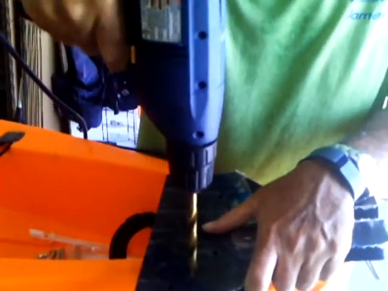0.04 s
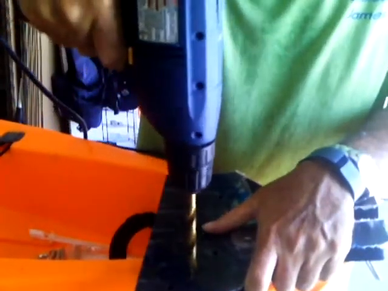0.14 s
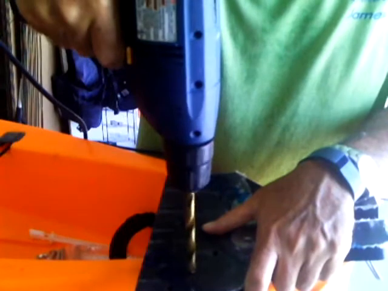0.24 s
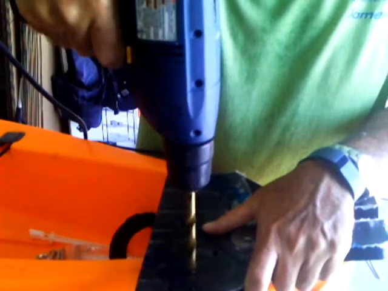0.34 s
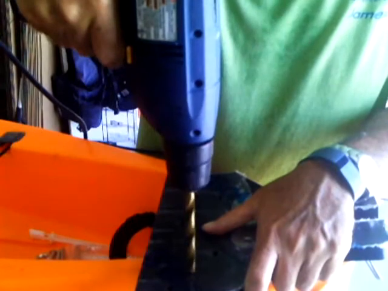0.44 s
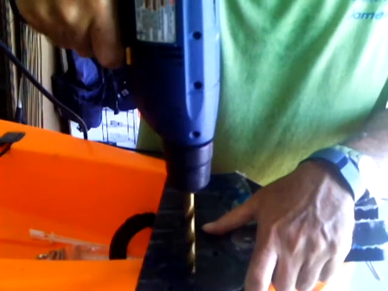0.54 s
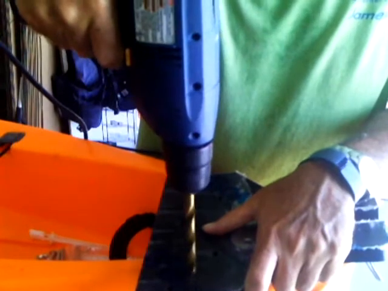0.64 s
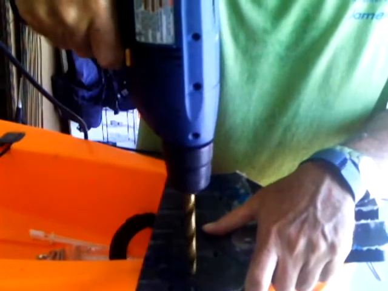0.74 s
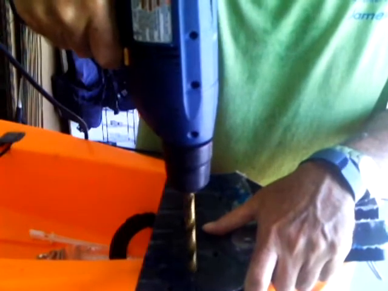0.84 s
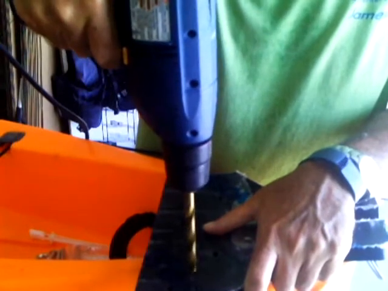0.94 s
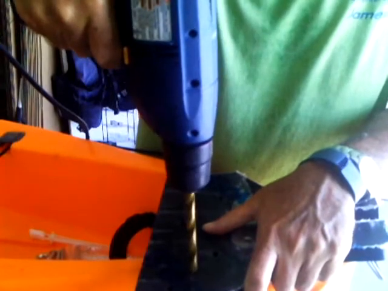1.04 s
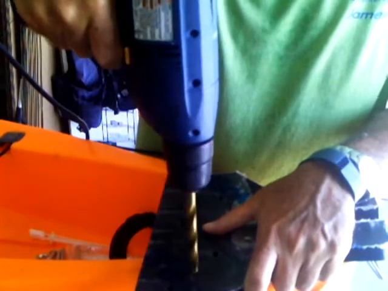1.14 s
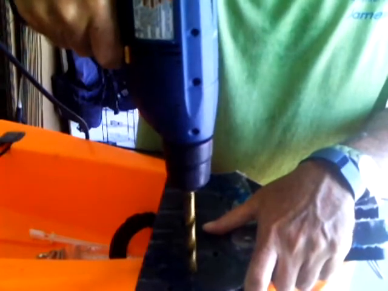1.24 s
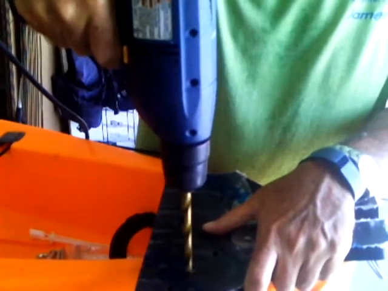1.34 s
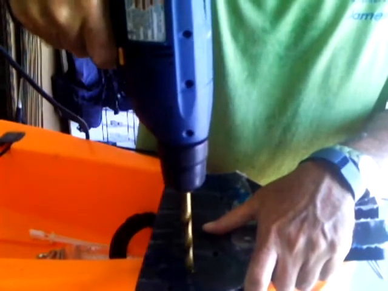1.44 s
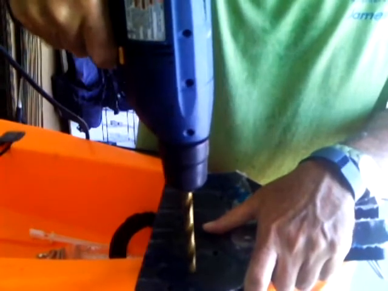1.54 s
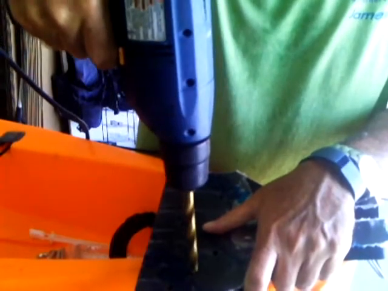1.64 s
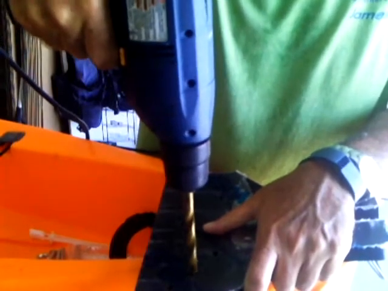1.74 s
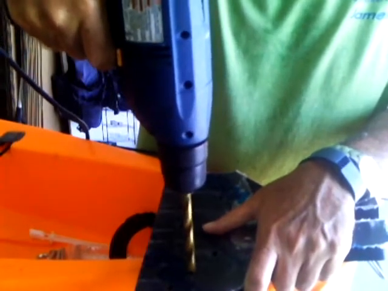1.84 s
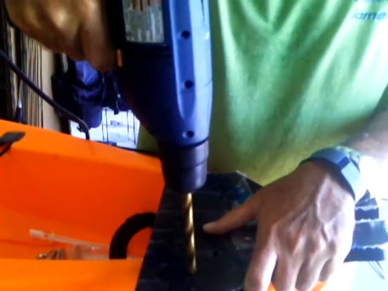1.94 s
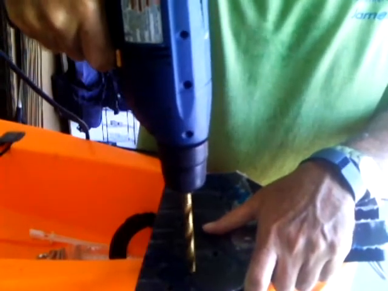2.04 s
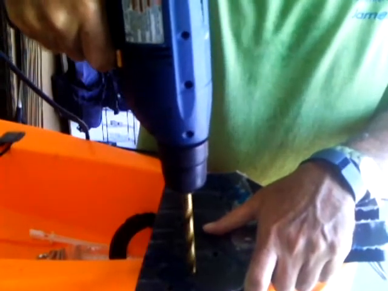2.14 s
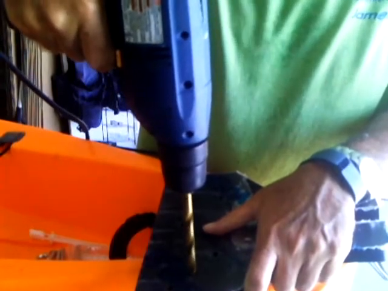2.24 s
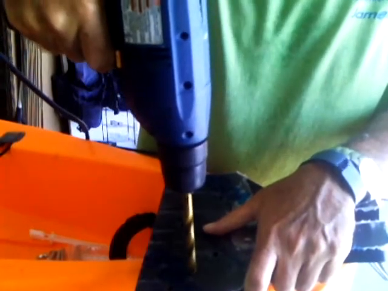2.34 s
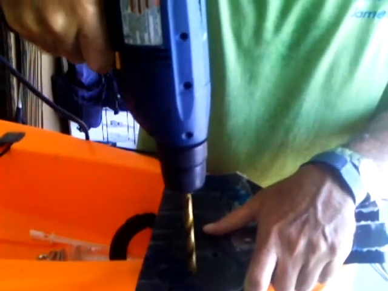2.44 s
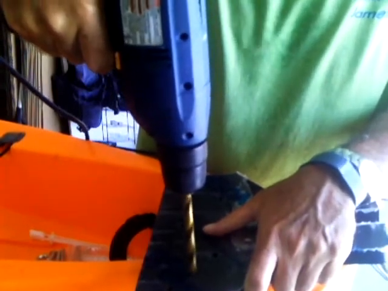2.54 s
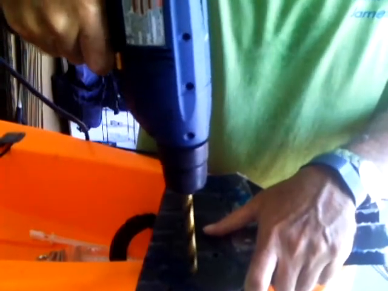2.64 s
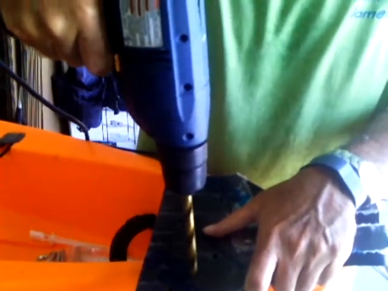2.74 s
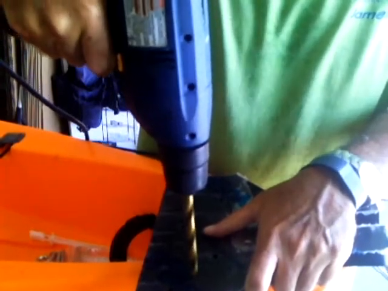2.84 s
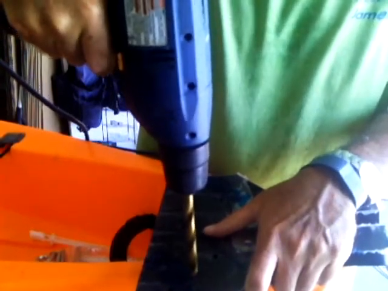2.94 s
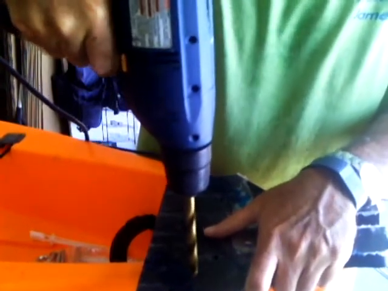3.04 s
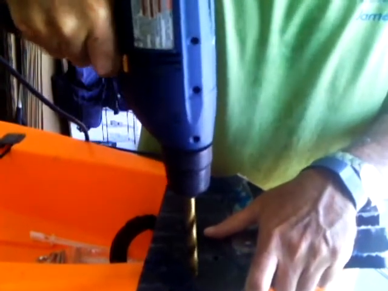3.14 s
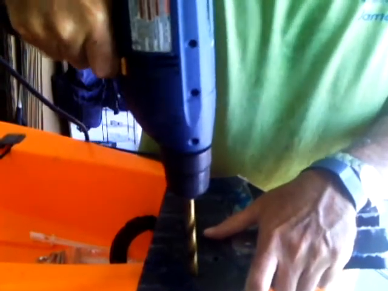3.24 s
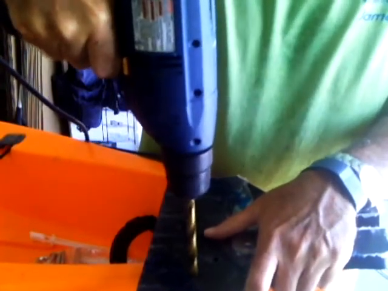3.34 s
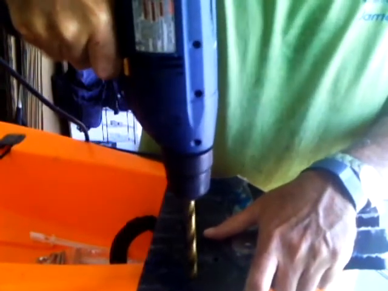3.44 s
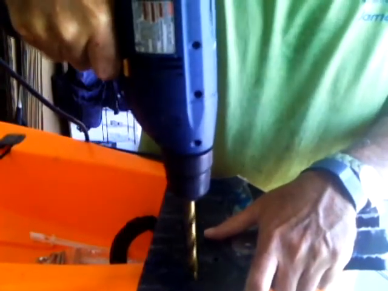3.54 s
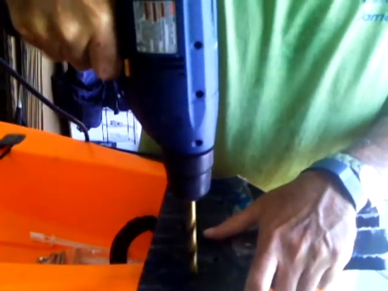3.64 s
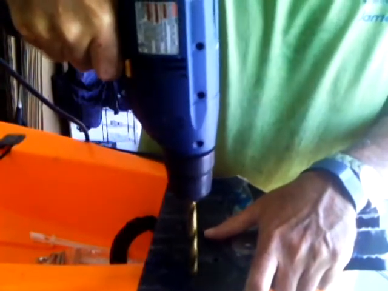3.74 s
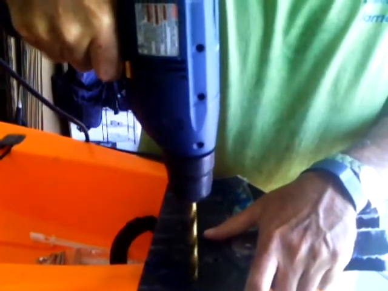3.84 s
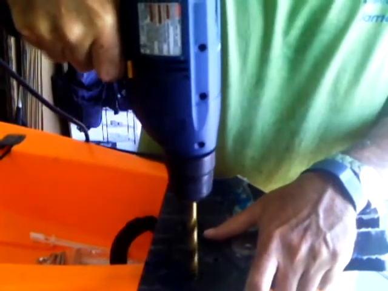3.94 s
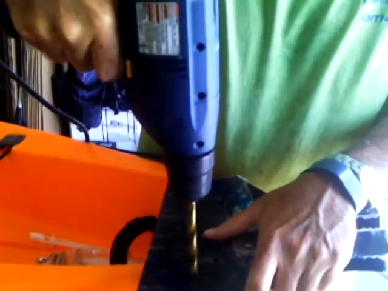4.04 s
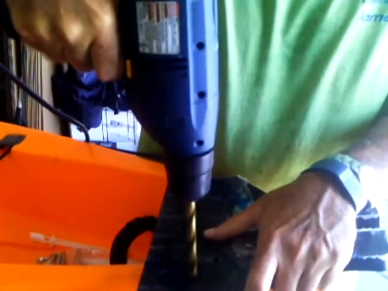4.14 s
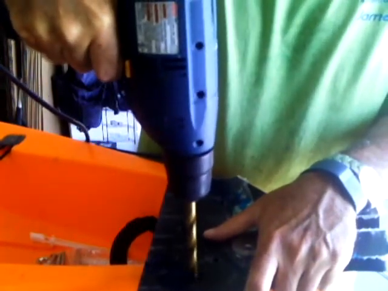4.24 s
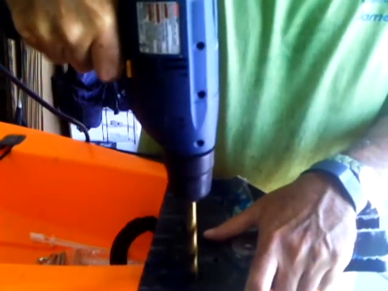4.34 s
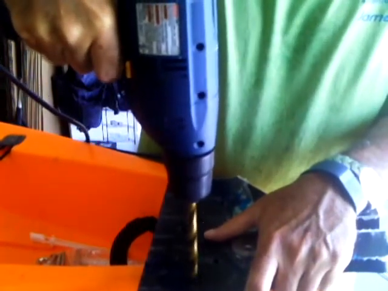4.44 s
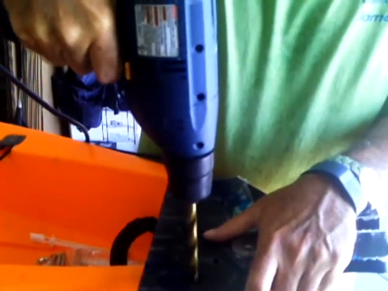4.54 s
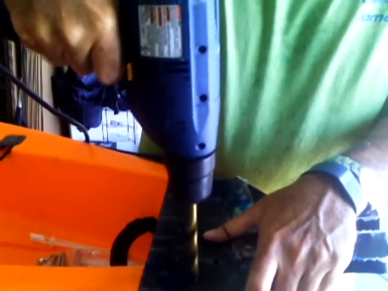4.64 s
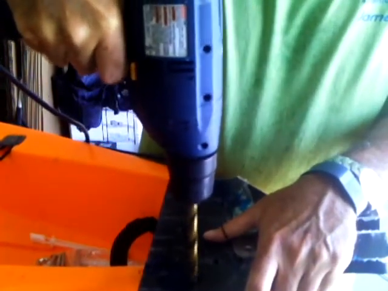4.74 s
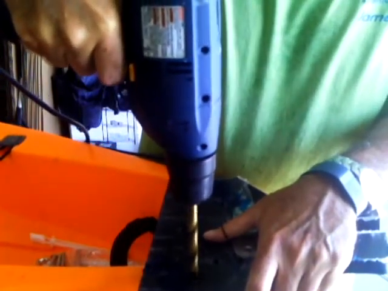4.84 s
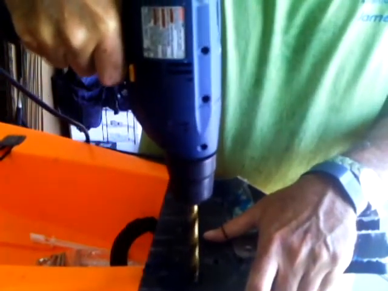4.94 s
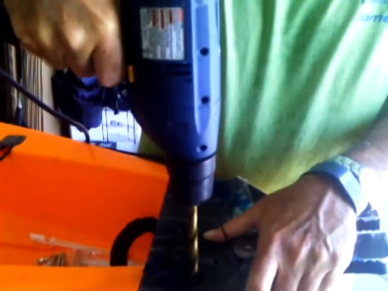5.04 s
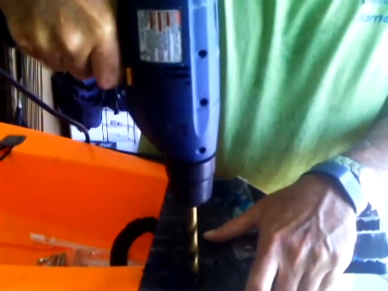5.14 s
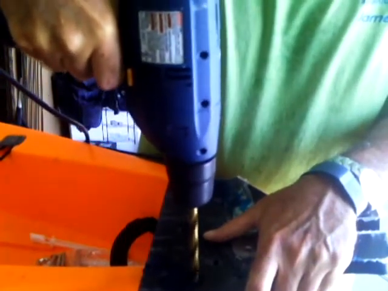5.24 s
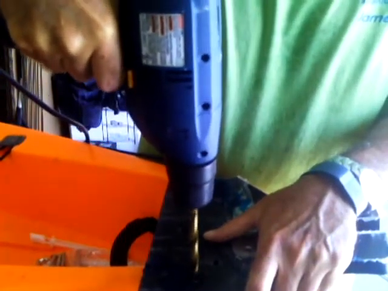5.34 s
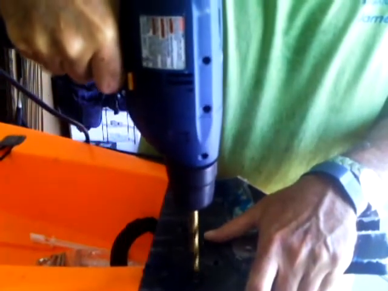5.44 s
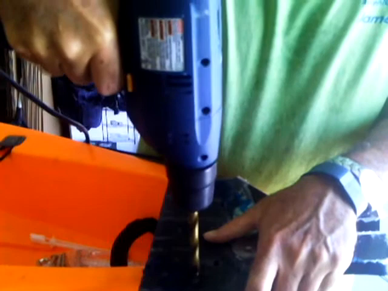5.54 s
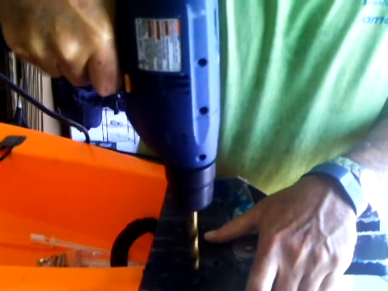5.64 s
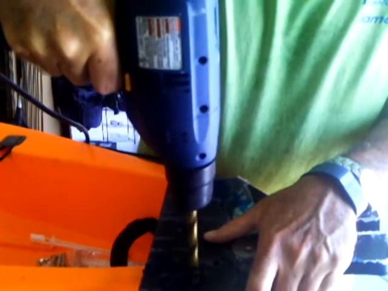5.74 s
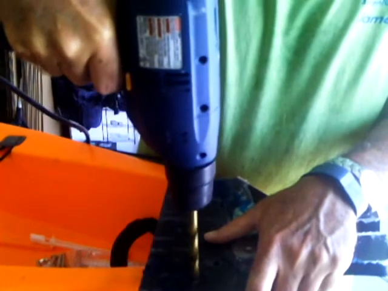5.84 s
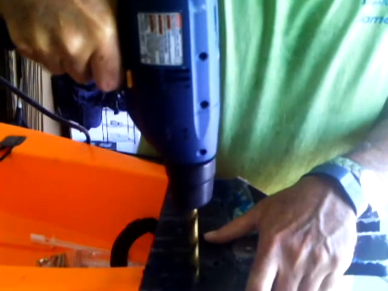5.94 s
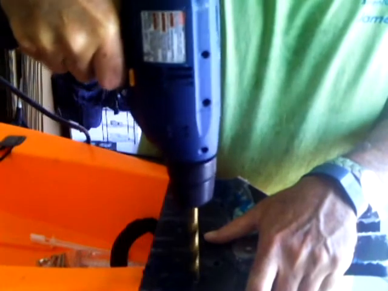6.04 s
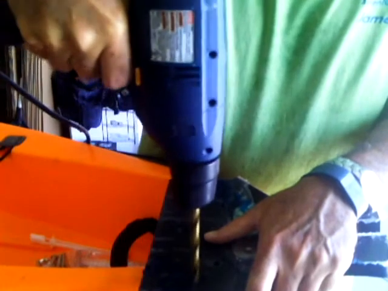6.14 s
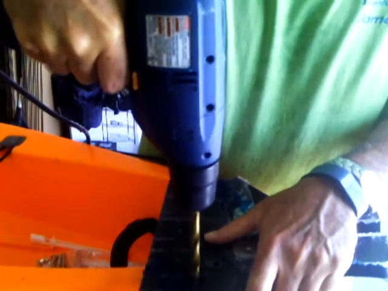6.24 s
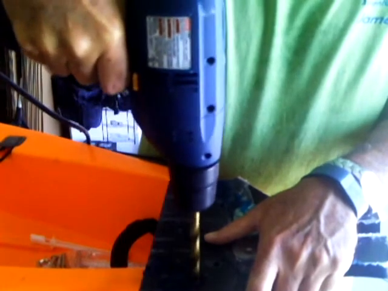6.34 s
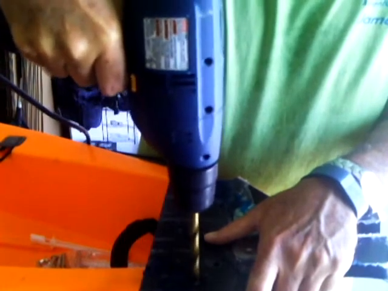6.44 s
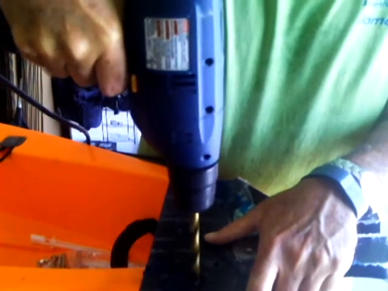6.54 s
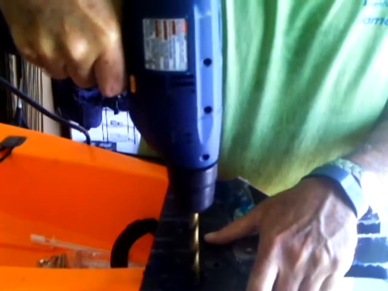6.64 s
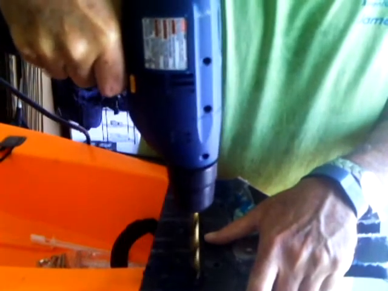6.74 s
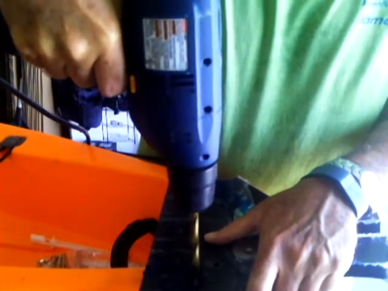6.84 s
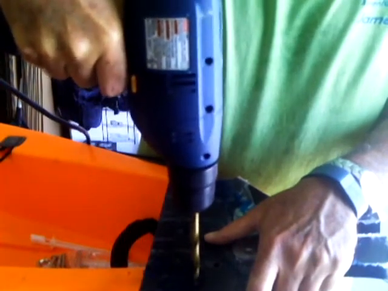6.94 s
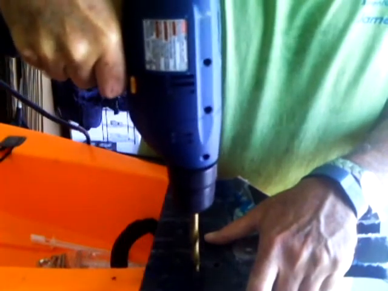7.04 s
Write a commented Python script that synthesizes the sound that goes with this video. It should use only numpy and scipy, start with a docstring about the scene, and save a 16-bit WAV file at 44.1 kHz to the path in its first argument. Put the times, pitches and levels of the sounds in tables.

```python
"""A corded drill, close by, starts on a half-pulled trigger and bores into a plastic board on a hull.
First, mains half-waves kick the motor: gear teeth knock, the shell shakes, and fan and brushes begin to rush.
As it winds up, the gears whine and throb, the commutator sings, and a bearing chatters over a quiet workshop.
Just before 1.5 s the level drops out briefly and comes back lower.
Later the bit bites, the speed sags and the board hums; each tone swells as its pitch meets a resonance."""
import sys
import numpy as np
from scipy import signal
from scipy.fft import rfft, irfft
from scipy.io import wavfile
from scipy.ndimage import uniform_filter1d

SR = 44100
rng = np.random.default_rng(int(sys.argv[2]) if len(sys.argv) > 2 else 0)


def output_pcm(signal):
    """Save a mono or channel-first signal as 16-bit PCM at the path in sys.argv[1].

    Samples are clipped to [-1, 1] before scaling.
    """
    pcm = np.clip(np.atleast_2d(signal).T, -1, 1) * 32767
    wavfile.write(sys.argv[1], SR, np.round(pcm).astype(np.int16))


N = 313110
T = np.arange(N) / SR  # time, s
HZ = np.fft.rfftfreq(N, 1 / SR)
TURN = 2 * np.pi  # radians in one turn
MAINS_HZ, PINION_TEETH = 60, 4


def amp(db):
    """Decibels to gain."""
    return 10 ** (np.asarray(db) / 20)


def unit(x):
    """Scales to rms 1."""
    return x / np.sqrt(np.mean(x ** 2) + 1e-20)


def curves(rows):
    """Each column of a table, joined by straight lines in time."""
    s, *columns = np.transpose(rows)
    return [np.interp(T, s, column) for column in columns]


def at_pitch(points, hz):
    """Gain of a tone as its pitch moves through a response of f/Hz, level/dB."""
    return amp(np.interp(hz, *np.transpose(points)))


def spectrum(points):
    """Decibels at every frequency, joined on a log axis."""
    hz, db = np.transpose(points)
    return np.interp(np.log(HZ + 1), np.log(hz + 1), db)


def resonance(hz, width_hz):
    """Bell over frequency, 1 at the resonance and one half at either edge of its width."""
    return 1 / (1 + (2 * (HZ - hz) / width_hz) ** 2)


def colour(x, db):
    """Filters by a gain in dB at every frequency."""
    return irfft(rfft(x) * amp(db), N)


def wander(rate_hz):
    """Random drift of rms 1 that falls away steeply above the rate."""
    coarse = np.arange(0, N / SR + .01, 1 / 2000)
    hz = np.fft.rfftfreq(len(coarse), coarse[1])
    white = rng.standard_normal(len(coarse))
    drift = irfft(rfft(white) / (1 + (hz / rate_hz) ** 4), len(coarse))
    return np.interp(T, coarse, unit(drift))


def bursts(turns, sharp):
    """One smooth power burst a turn, of mean 1."""
    bump = np.exp(sharp * np.cos(TURN * turns))
    return bump / bump.mean()


# speed lost below a plain exponential wind-up: uneven spin-up first, the bit's load later,
# columns: [t/s, motor turns per second lost]
SPEED_LOST = [(0.54, 1.2), (0.65, 12.3), (0.79, 7.7), (1.4, 20.1), (1.62, 9.8), (1.92, 4.8), (2.23, 5.3),
              (2.73, 1.9), (3.2, 5.0), (3.83, 21.8), (4.31, 17.4), (4.74, 23.2), (5.03, 46.7), (5.33, 51.9),
              (5.85, 32.6), (6.08, 31.1), (6.36, 56.6), (6.67, 64.8)]
START_S, WIND_UP_S, TOP_TURNS_PER_S = .145, .45, 462
FULL_SAG_TURNS_PER_S = 60


def motor():
    """Shaft turns per second, and the sag (1 = full): an exponential wind-up less the sag, eased by inertia."""
    lost = uniform_filter1d(curves(SPEED_LOST)[0], size=4410)  # over 0.1 s
    free = TOP_TURNS_PER_S * (1 - np.exp(-(T - START_S) / WIND_UP_S))
    return np.maximum(free - lost, 5), lost / FULL_SAG_TURNS_PER_S


def effort(top_db, sag_db, slow_db):
    """Gain of a layer that changes with the sag and with the speed missing from the top."""
    speed, sag = motor()
    return amp(top_db + sag_db * sag + slow_db * (1 - speed / TOP_TURNS_PER_S))


# half-pulled trigger, columns: [t/s, share of the drive that comes in mains half-waves 0-1]
HALF_WAVE_SHARE = [(.23, 0.8), (.3, 0.3), (.42, 0.66), (.56, 0.48), (.8, 0.24), (1.5, 0)]
GEAR_RATIO = .131  # large-gear turns per shaft turn


def motion():
    """Shaft and large-gear angles in turns, by adding up the speed, and the strength of the electric drive."""
    speed, _ = motor()
    shaft = np.cumsum(speed * (1 + 0.00031 * wander(24.7))) / SR
    gear = GEAR_RATIO * shaft + .025 * wander(10)
    chopped = np.clip(curves(HALF_WAVE_SHARE)[0], 0, 1)
    drive = np.sqrt(1 - chopped + chopped * bursts(MAINS_HZ * T - .55, sharp=2.1))
    return shaft, gear, drive


# the bit is pressed hard, columns: [start t/s, length/s, strength 0-1]
HARD_PRESSES = [(4.68, 0.43, 0.97), (6.05, 0.27, 0.87), (6.38, 0.79, 1)]


def pressing():
    """How hard the hand bears down, 0-1: each press swells and eases in one arch."""
    arches = 0
    for s, length, strength in HARD_PRESSES:
        arches = arches + strength * np.sin(np.pi * np.clip((T - s) / length, 0, 1))
    return arches


# play of the gears, columns: [t/s, throb depth of the large gear, relative tooth slack]
GEAR_PLAY = [(.6, 0.17, 0.32), (.78, .28, .8), (1.1, 0.87, 0.45), (1.65, .94, 0.59), (1.95, 0.97, 0.14),
             (3, 0.7, 0.13), (6, 0.64, 0.19), (6.6, 0.36, 0.24)]


def gear_play():
    """Throb depth and tooth slack over time: an off-centre gear throbs, and slack teeth strike unevenly."""
    return curves(GEAR_PLAY)


# mesh tone, its second and its fourth harmonic, each against its own pitch, columns: [f/Hz, level/dB]
MESH_RESPONSE = [(1450, -48), (1560, -45), (1650, -36.5), (1760, -31), (1805, -32), (1830, -29.5)]
MESH_SECOND_RESPONSE = [(1300, -46), (1600, -27.5), (2000, -26.5), (2280, -21), (2750, -29), (3190, -20.5),
                        (3290, -22), (3400, -26), (3540, -27), (3610, -26.5), (3670, -29)]
MESH_FOURTH_RESPONSE = [(5400, -34), (5900, -39), (6400, -31), (6650, -29.5), (7000, -38), (7250, -54)]


def gears(shaft, gear, drive):
    """The pinion's mesh tone; the off-centre large gear presses the teeth once a turn, and so does each mains kick."""
    mesh_hz = PINION_TEETH * motor()[0]
    throb, slack = gear_play()
    mesh = TURN * PINION_TEETH * shaft + .12 * np.sin(TURN * gear) + .55 * slack * wander(90)
    press = np.exp(throb * np.cos(TURN * gear)) * drive ** 3
    # keep the pulsing but even out its running power, over four mains cycles
    press /= np.sqrt(uniform_filter1d(press ** 2, size=2940))
    out = np.zeros(N)
    for k, response in ((1, MESH_RESPONSE), (2, MESH_SECOND_RESPONSE), (4, MESH_FOURTH_RESPONSE)):
        # slack teeth strike unevenly, which thickens the line into a band
        rasp = 1.4 * slack * wander(240)
        line = np.sqrt(2) * np.cos(k * mesh) * (1 + rasp) / np.hypot(1, slack)
        out += at_pitch(response, k * mesh_hz) * line * press
    return out


# the commutator's whistle against its own pitch, columns: [f/Hz, level/dB]
WHISTLE_RESPONSE = [(5200, -50), (6500, -33), (8000, -41), (8900, -29.5), (10300, -29.5), (10500, -27),
                    (11180, -29), (11420, -32.5), (11780, -37.5), (11890, -30.5)]
COMMUTATOR_BARS, WHISTLE_PRESS_DB = 26, -5  # a full press dims the whistle


def commutator(shaft):
    """Bars pass the brushes; the mains ripple in the torque makes their whistle flutter."""
    mains = TURN * MAINS_HZ * T
    angle = TURN * COMMUTATOR_BARS * shaft + 0.28 * np.sin(mains) + 0.19 * wander(60)
    flutter = 1 + 0.099 * np.cos(mains + .5 * wander(3.2)) + 0.24 * wander(45)
    level = at_pitch(WHISTLE_RESPONSE, COMMUTATOR_BARS * motor()[0])
    return level * amp(WHISTLE_PRESS_DB * pressing()) * unit(np.cos(angle) * flutter)


# broad colour of the drill body, columns: [f/Hz, relative level/dB per Hz]
HOUSING_COLOUR = [(60, -36), (250, -25.5), (500, -16), (750, -15), (1050, -2), (2500, -2), (4200, 0.5),
                  (6000, -1), (7100, -2), (8000, -12), (9000, -13), (11500, -9), (14000, -19.5),
                  (15400, -30)]
# resonances of the shell, columns: [f/Hz, width/Hz, level/dB]
SHELL_RESONANCES = [(1213, 190, 3.5), (2045, 380, 3), (2610, 250, -1.5), (3197, 165, 6.5), (4420, 570, 2),
                    (6580, 200, 4)]


def housing_db():
    """The broad colour of the drill body with its shell resonances, in dB at every frequency."""
    return spectrum(HOUSING_COLOUR) + sum(db * resonance(hz, width) for hz, width, db in SHELL_RESONANCES)


RUSH_DB, RUSH_SAG_DB = -20, 3  # level at top speed, and what full sag adds
# lift at top speed, change under full sag, change when slow (at standstill), all dB
LOW_LIFT_DB, LOW_SAG_DB, LOW_SLOW_DB = 1.62, -2.5, -7
TREBLE_LIFT_DB, TREBLE_SAG_DB, TREBLE_SLOW_DB = 2, -2.8, -3.5
CHATTER_PER_TURN = 2 / 3


def rush_gain():
    """The rush grows in proportion to the speed, and further as the speed sags below the free wind-up."""
    speed, sag = motor()
    return amp(RUSH_DB + RUSH_SAG_DB * sag) * speed / TOP_TURNS_PER_S


def rush(shaft, gear, drive):
    """Air hiss and tiny tooth and brush impacts ring the housing, pulsed by gear, bearing and mains."""
    low_lift = effort(LOW_LIFT_DB, LOW_SAG_DB, LOW_SLOW_DB)
    treble_lift = effort(TREBLE_LIFT_DB, TREBLE_SAG_DB, TREBLE_SLOW_DB)
    throb, _ = gear_play()
    impacts = (rng.random(N) < 2500 / SR) * rng.standard_normal(N)  # about 2500 a second
    source = rng.standard_normal(N) + .5 * unit(impacts)
    bearing_pulse = bursts(CHATTER_PER_TURN * shaft + 0.15 * wander(30), sharp=0.41)
    gear_pulse = np.exp(0.18 * throb * np.cos(TURN * gear))
    pulsed = source * np.sqrt(bearing_pulse * gear_pulse) * amp(0.32 * wander(41))
    body = unit(colour(pulsed, housing_db()))
    low = irfft(rfft(body) / (1 + (HZ / 2400) ** 6), N)
    treble = irfft(rfft(body) / (1 + (8000 / (HZ + 1)) ** 10), N)
    body = body + (low_lift - 1) * low + (treble_lift - 1) * treble
    return rush_gain() * body * drive ** 0.56


# rattle of loose teeth: which mesh harmonics, columns: [multiple of the mesh rate]
LOOSE_MULTIPLES = [3, 5, 6, 8, 10]
# and how strong each is before the case colours it, columns: [relative level/dB]
LOOSE_LEVELS = [-17.5, -13.5, -10.5, -11.5, -11]
GEAR_CASE_HZ, GEAR_CASE_WIDTH_HZ, GEAR_CASE_DB = 11050, 900, 6.5


def loose_teeth(shaft, gear, drive):
    """Once a gear turn, backlash smears the high mesh harmonics into hiss, lifted at the gear case resonance."""
    mesh = TURN * PINION_TEETH * shaft + .15 * np.sin(TURN * gear) + .17 * wander(110)
    bands = np.zeros(N)
    for k, db in zip(LOOSE_MULTIPLES, LOOSE_LEVELS):
        bands += amp(db) * unit(np.cos(k * mesh) * (1 + 0.47 * wander(110)))
    ring_db = housing_db() + GEAR_CASE_DB * resonance(GEAR_CASE_HZ, GEAR_CASE_WIDTH_HZ)
    throb, slack = gear_play()
    press = np.exp(throb * (np.cos(TURN * gear) - .4)) * drive ** 2
    return colour(bands, ring_db) * rush_gain() * amp(4.1 * slack) * press


# lines of the bearing chatter, columns: [multiple of the chatter rate]
CHATTER_LINES = [4, 10, 11, 13, 14, 16, 18, 20, 26, 30, 40, 43]
# and their strengths, columns: [relative level/dB]
CHATTER_LINE_LEVELS = [-9, -4, 0, -3, -3, -8, -9, -10, -15, -24, -13, -20]
# level at top speed, what full sag adds, change when slow (at standstill)
CHATTER_LEVEL_DB, CHATTER_SAG_DB, CHATTER_SLOW_DB = -30.5, 5.5, -12


def chatter(shaft, gear):
    """A bearing rattles twice in three turns and gives a comb of wavering lines."""
    angle = TURN * CHATTER_PER_TURN * shaft
    lines = np.zeros(N)
    for k, db in zip(CHATTER_LINES, CHATTER_LINE_LEVELS):
        phase = TURN * rng.random() + 0.65 * wander(26)
        lines += amp(db) * np.cos(k * angle + phase) * (1 + 0.63 * wander(3.0))
    throbbing = unit(lines * (1 + 0.26 * np.cos(TURN * gear)))
    return effort(CHATTER_LEVEL_DB, CHATTER_SAG_DB, CHATTER_SLOW_DB) * throbbing


# gear teeth knock as the first kicks take up the slack, columns: [t/s, relative level/dB]
FIRST_KNOCKS = [(0.107, -37), (0.124, -31), (0.158, -38), (0.174, -29.5), (0.208, -18), (0.224, -34),
                (0.241, -19.5), (0.258, -15), (0.274, -17), (0.421, -13)]


def knocks():
    """Short cracks of the gear train, noise that dies in milliseconds, heard through the housing."""
    out = np.zeros(N)
    for s, db in FIRST_KNOCKS:
        age = np.maximum(T - s, 0)
        out += amp(db + 3) * (T > s) * np.exp(-age / .0016) * rng.standard_normal(N)
    return colour(out, housing_db() - HZ / 2500)  # duller towards the treble


# while the motor labours, each mains kick shakes the shell, columns: [t/s, level/dB]
SHAKE_LEVEL = [(.2, -50), (.32, -33), (.42, -46), (.59, -28), (.85, -44), (1.5, -73)]
# the modes that it rings, columns: [f/Hz, width/Hz, relative level/dB]
RINGING_MODES = [(2310, 130, 0), (3100, 220, -7)]


def shaken_shell(drive):
    """Each kick throws the gears against the shell, which rings on for a few milliseconds."""
    rattle = rng.standard_normal(N) * drive ** 4
    ring = np.zeros(N)
    for hz, width, db in RINGING_MODES:
        b, a = signal.iirpeak(hz, hz / width, fs=SR)
        ring += amp(db) * signal.lfilter(b, a, rattle)
    return amp(curves(SHAKE_LEVEL)[0]) * unit(ring)


OUTPUT_MESH_PER_TURN = 1.295
BOARD_SAG_DB, BOARD_PRESS_DB = -51.5, -46.5  # hum under full sag, and under a full press


def board(shaft):
    """The slower output gears hum through the bit into the board, most when it is pressed hard."""
    angle = TURN * OUTPUT_MESH_PER_TURN * shaft + .35 * wander(20)
    level = np.maximum(amp(BOARD_SAG_DB) * motor()[1] ** 2, amp(BOARD_PRESS_DB) * pressing())
    return level * unit((np.cos(angle) + 0.19 * np.cos(angle / 2)) * (1 + 0.32 * wander(25)))


# workshop background, columns: [f/Hz, relative level/dB per Hz]
WORKSHOP_COLOUR = [(18, -59), (30, -27), (81, -8.5), (274, -12.5), (304, -10.5), (581, -10), (629, -8),
                   (716, -14), (774, -7.5), (8690, -27), (15000, -36)]
ROOM_DB, HUM_HZ, HUM_DB = -50, 80, -61


def workshop():
    """Quiet room noise with a low wavering hum that fades over the first two seconds."""
    hum = np.cos(TURN * HUM_HZ * T + .7 * wander(7)) * (1 + .3 * wander(9))
    fading = np.interp(T, [.3, 1.3, 2], [1, .85, .35])
    noise = unit(colour(rng.standard_normal(N), spectrum(WORKSHOP_COLOUR)))
    return amp(ROOM_DB) * noise + amp(HUM_DB) * fading * unit(hum)


def scene():
    """First the knocks, then the rush builds, and the drill's tones rise out of it once the motor turns."""
    shaft, gear, drive = motion()
    waking = np.clip(T / .28, 0, 1) ** 2
    turning = np.clip((T - .25) / 0.34, 0, 1)
    tones = gears(shaft, gear, drive) + loose_teeth(shaft, gear, drive) + commutator(shaft)
    tones += chatter(shaft, gear) + board(shaft)
    noise = rush(shaft, gear, drive) + shaken_shell(drive)
    return (turning * tones + waking * noise + knocks() + workshop())[None]


# the level drops out and returns lower, columns: [t/s, level/dB]
LEVEL_STEP = [(1.48, 0), (1.481, -20), (1.493, -24), (1.496, -60), (1.5, -60), (1.503, -28), (1.51, -19),
              (1.512, -38), (1.5145, -10.7)]
NOTCH_HZ, NOTCH_HALF_WIDTH_HZ, EDGE_HZ = 8230, 300, 15400


def record(dry):
    """A fixed filter cuts a deep narrow notch in the treble; the level steps down; then the band limit."""
    offset = HZ - NOTCH_HZ
    notch = abs(offset) / np.hypot(offset, NOTCH_HALF_WIDTH_HZ)
    heard = irfft(rfft(dry[0]) * notch, N) * amp(curves(LEVEL_STEP)[0])
    band_limit = signal.firwin(511, EDGE_HZ, window=("kaiser", 9), fs=SR)
    return signal.oaconvolve(heard, band_limit, "same")[None]


dry = scene()
out = record(dry)
output_pcm(out)
```